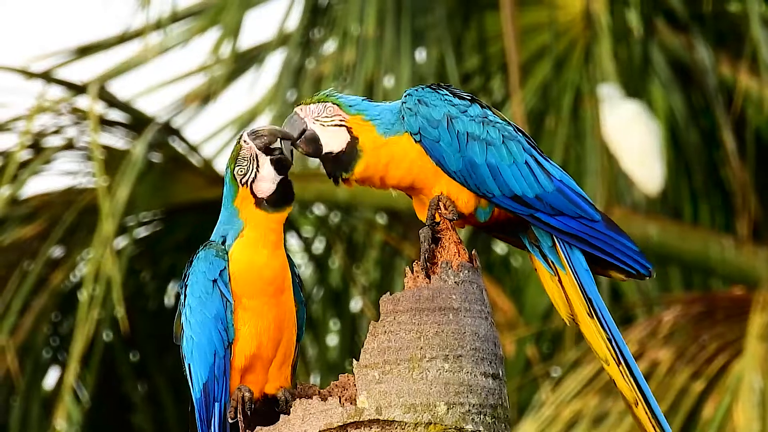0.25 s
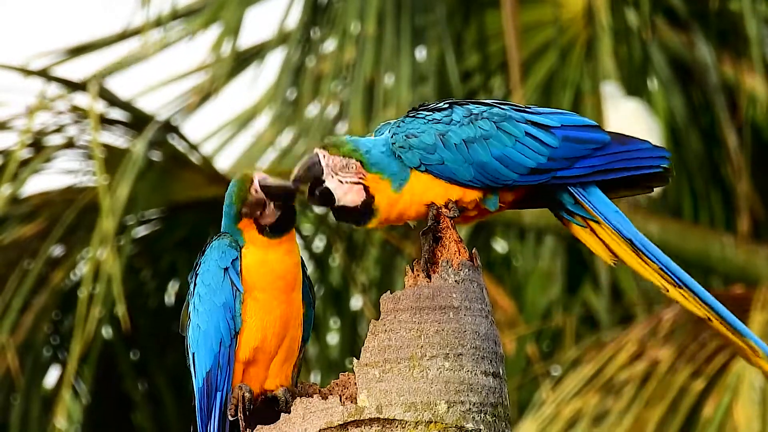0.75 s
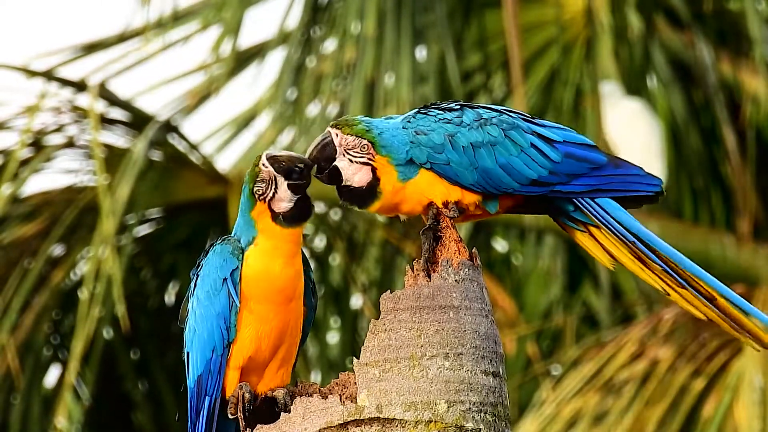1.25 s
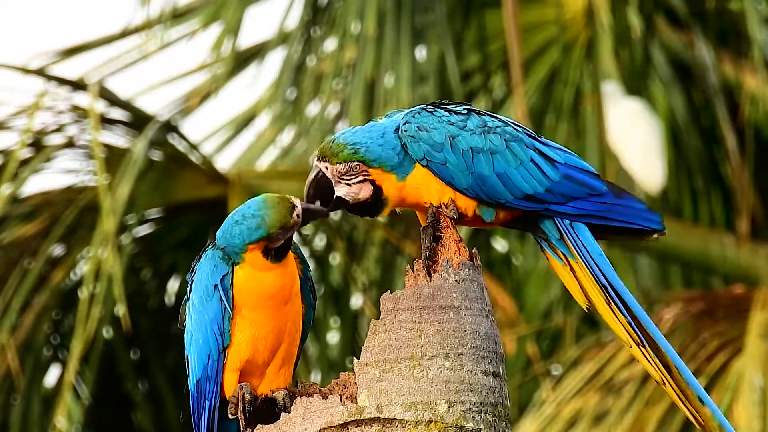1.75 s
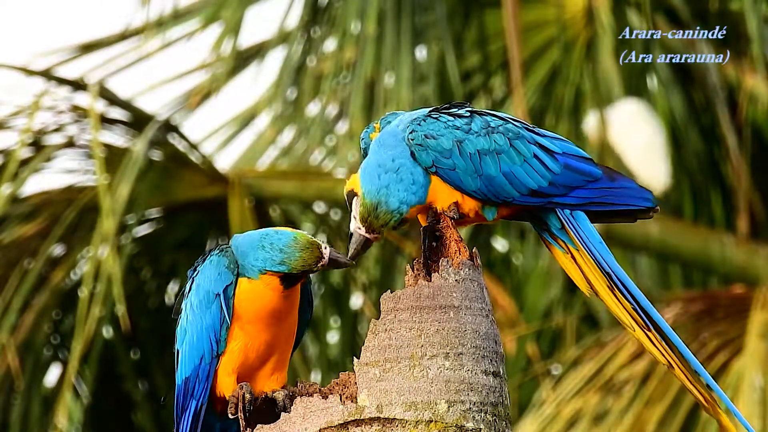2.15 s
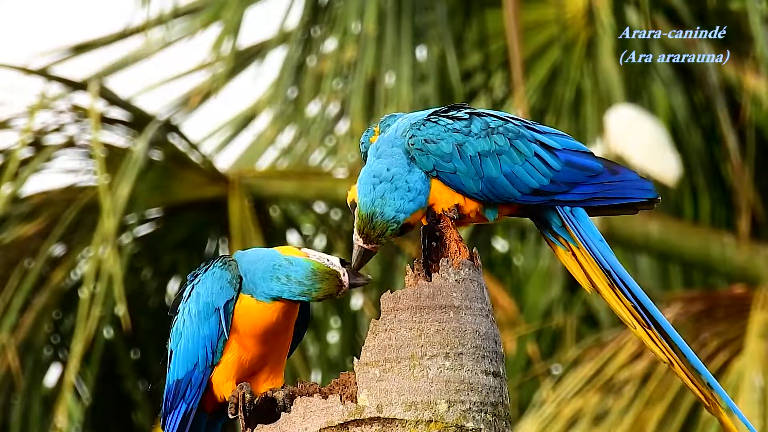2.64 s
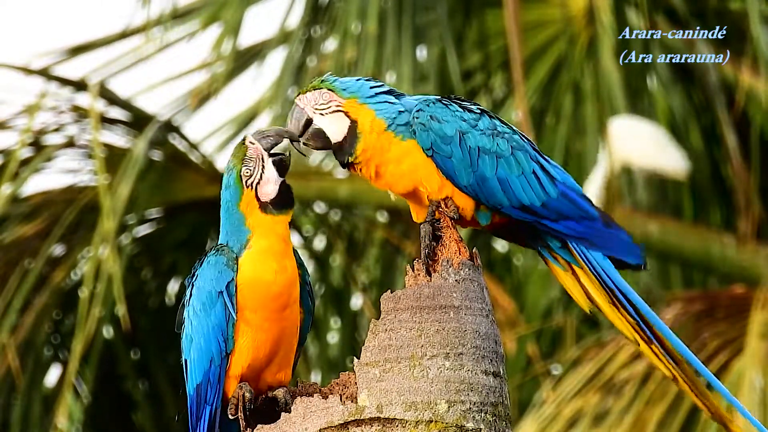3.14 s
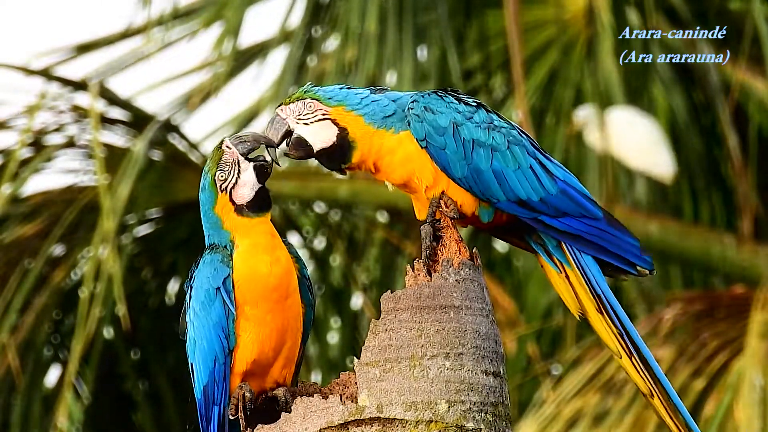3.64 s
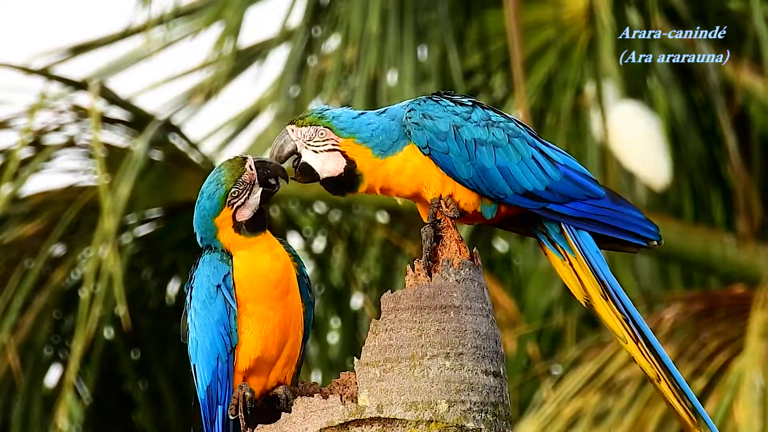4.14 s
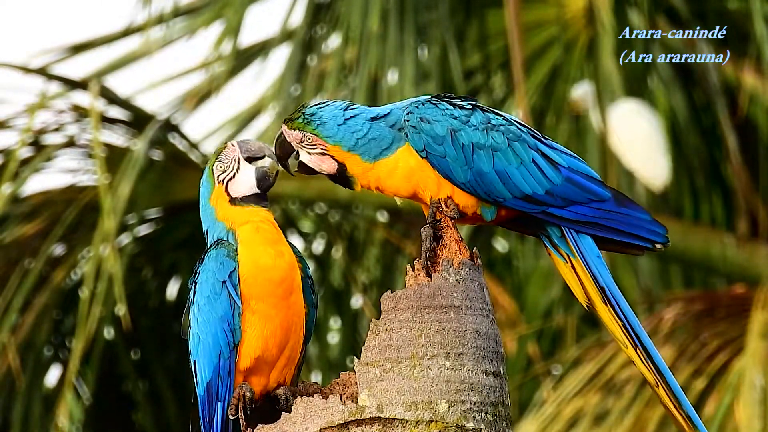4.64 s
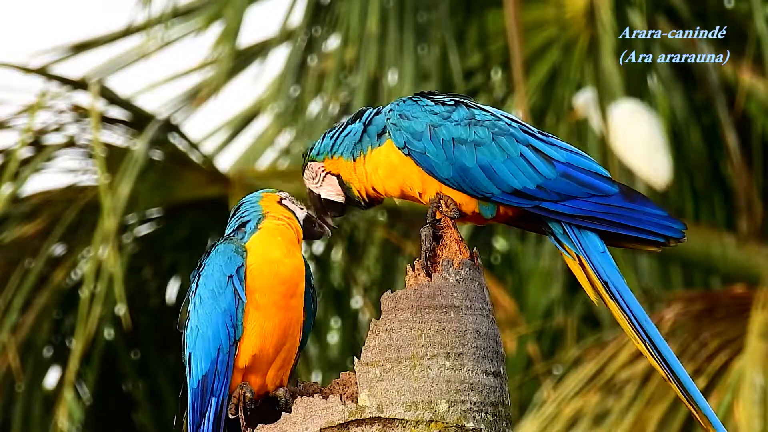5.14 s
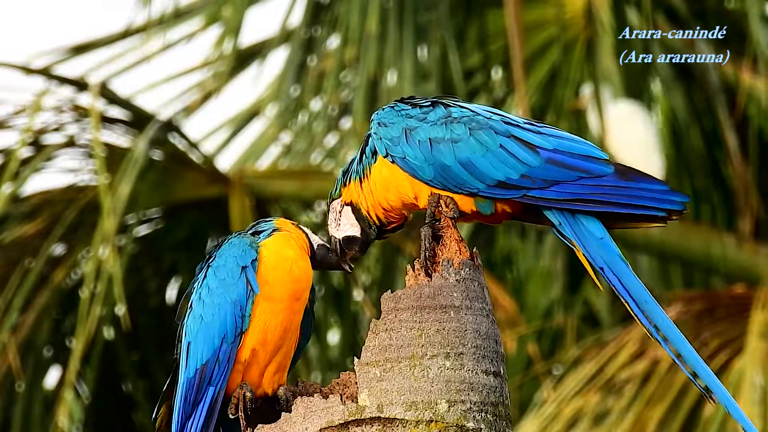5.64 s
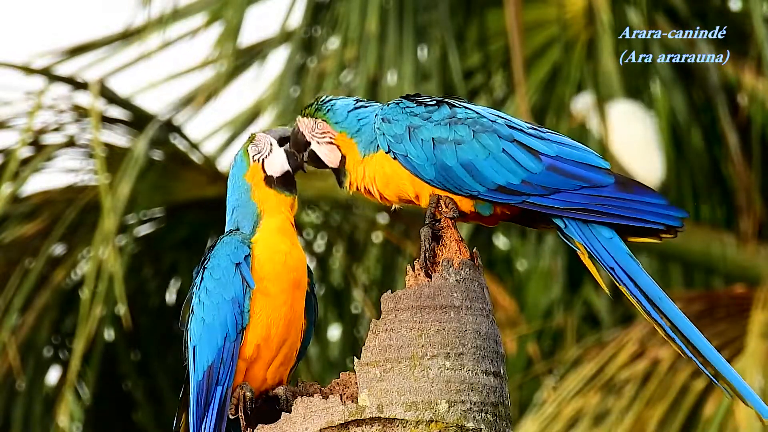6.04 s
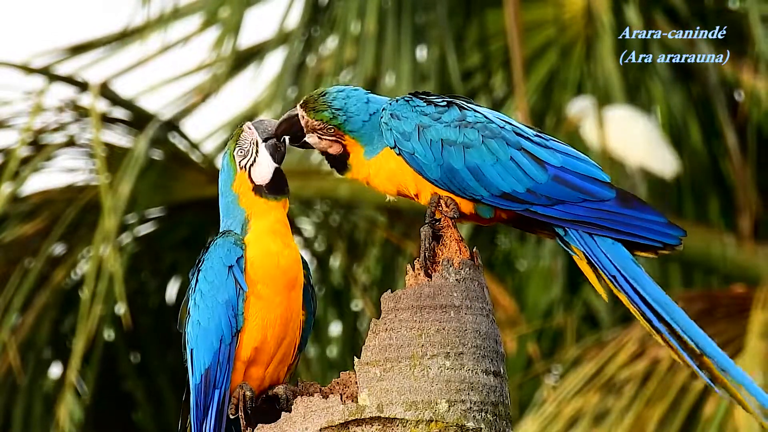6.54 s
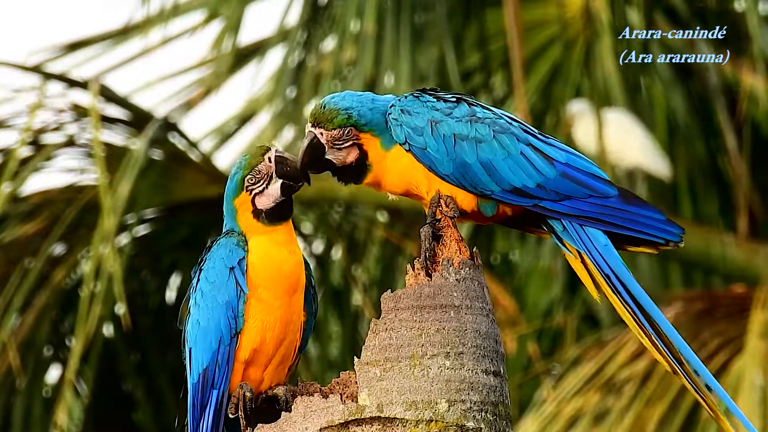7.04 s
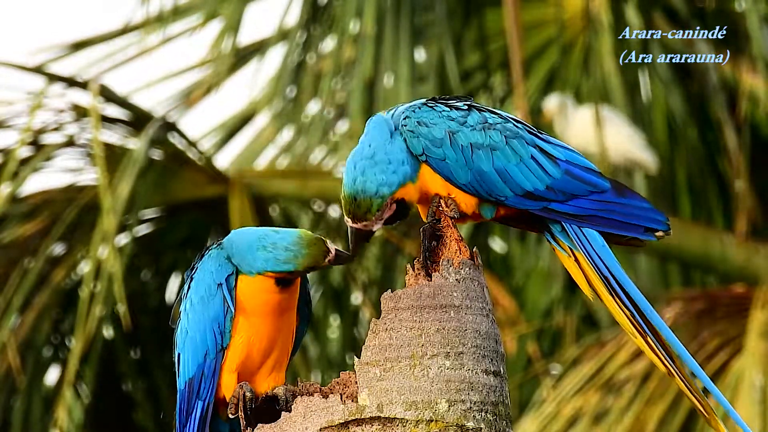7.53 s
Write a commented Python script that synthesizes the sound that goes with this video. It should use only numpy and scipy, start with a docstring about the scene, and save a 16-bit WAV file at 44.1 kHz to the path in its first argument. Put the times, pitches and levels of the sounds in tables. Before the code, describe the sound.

A steady, bright hiss of air and leaves runs throughout, with faint twittering from distant birds. Two macaws call fairly close, near the centre, with a short echo from the trees. After a small squeak, harsh squawks start at about 0.5 seconds and build to a loud, longer cry at 1.1 to 1.3 seconds. Quick rasps, creaks and squeaks follow until 2 seconds, then the birds pause. A soft grumble at 3.2 seconds leads to a rasp and a loud, rough screech at 3.6 seconds. Quiet, hoarse squeaks follow. A clear chirp rises and falls from 4.7 to 4.9 seconds, with a shorter second arch at 5.3 seconds and small squeaks around it. Softer growling squawks come between 6.3 and 6.7 seconds, then a creak at 7 seconds, a faint rasp and a few last squeaks around 7.5 seconds.

```python
"""Two macaws squawk and squeak outdoors as they fence with their beaks on a palm stump.
Squawks: ragged syrinx pulses ring the throat and windpipe. Short squeaks and a clear chirp
in two arches: harmonics through a beak resonance. Far birds twitter and whistle in a steady
bright hiss, with two faint hoots and one dull tick. The trees send back a short echo."""
import sys
import numpy as np
from scipy import signal
from scipy.fft import rfft, irfft
from scipy.io import wavfile
from scipy.ndimage import uniform_filter1d, map_coordinates

SR = 44100
rng = np.random.default_rng(int(sys.argv[2]) if len(sys.argv) > 2 else 0)


def store_wav(level_fs):
    """Save 16-bit WAV to argv[1]."""
    pcm = np.round(np.clip(np.atleast_2d(level_fs), -1, 1) * 32767)
    wavfile.write(sys.argv[1], SR, pcm.T.astype(np.int16))


N = 343180


def from_db(db):
    """Decibels to gain."""
    return 10 ** (np.asarray(db) / 20)


def rms_one(x):
    """Scale to unit power."""
    return x / np.sqrt(np.mean(x ** 2) + 1e-20)


def level_out(voice):
    """Hold the running power at 1."""
    power = uniform_filter1d(uniform_filter1d(voice ** 2, size=400), size=400)
    return voice / np.sqrt(power + 1e-12)


def at_hz(points, hz):
    """Read a spectrum on a log-frequency axis."""
    points = np.array(points)
    return np.interp(np.log(np.maximum(hz, 1)), np.log(points[:, 0]), points[:, 1])


def drift(size, rate_hz):
    """Smooth random wander, spread about 1."""
    step = np.arange(size) * rate_hz / SR
    return map_coordinates(rng.standard_normal(4096), [step], order=3, mode="wrap")


def butter(x, hz, kind, order):
    """Causal high- or low-pass."""
    return signal.sosfilt(signal.butter(order, hz, kind, fs=SR, output="sos"), x)


def resonance(x, hz, width_hz):
    """Two-pole resonator, peak gain 1, applied twice for steep skirts."""
    r = np.exp(-np.pi * width_hz / SR)
    b = np.array([1, 0, -1]) * (1 - r * r) / 2
    a = [1, -2 * r * np.cos(2 * np.pi * hz / SR), r * r]
    return signal.lfilter(b, a, signal.lfilter(b, a, x))


def span(start_s, end_s, fade_s):
    """Time axis and window of a call; fades centred on its ends."""
    t = np.arange(int((start_s - fade_s / 2) * SR), int((end_s + fade_s / 2) * SR)) / SR
    ramp = np.clip(np.minimum(t - start_s, end_s - t) / fade_s + .5, 0, 1)
    return t, np.sin(np.pi / 2 * ramp)


def add(out, t, sound):
    """Mix a call in at its time."""
    first = int(round(t[0] * SR))
    out[first:first + len(t)] += sound[:max(N - first, 0)]


def hiss():
    """Steady air and leaf hiss: centred in the midrange, wide in the treble."""
    spectrum = [(71, -99), (120, -67), (300, -51.5), (563, -29), (733, -29.5), (975, -15), (1120, -14),
                (1410, -2), (1690, -6.5), (2300, -6.5), (3000, -4), (3580, -3), (4050, -4), (6600, 2.5),
                (8950, -12), (10100, -26), (15500, -32.5)]  # (frequency [Hz], relative density [dB])
    # humps, hollows, thin whines: (centre [Hz], width [Hz], lift [dB])
    peaks = [(900, 26, 3), (1016, 89, -1), (1230, 97, 0), (1510, 100, -2.5), (3450, 100, 1.5),
             (3890, 57, -6), (7150, 160, 1), (7760, 280, -6), (8340, 35, 4), (8740, 40, 4), (8880, 35, 4),
             (9125, 100, 4.5)]
    stereo_width = [(60, -2), (110, 0), (200, -16), (380, -19), (700, -23.5), (1290, -16), (2380, -10.5),
                    (4400, -5), (8120, 1.5), (15000, 1)]  # (frequency [Hz], side minus mid [dB])
    hz = np.arange(N // 2 + 1) * SR / N
    peaks_db = sum(db * np.exp(-.5 * ((hz - centre) / width) ** 2) for centre, width, db in peaks)
    mid, side = rfft(rng.standard_normal((2, N))) * from_db(at_hz(spectrum, hz) + peaks_db)
    mid = irfft(mid, N)
    side = irfft(side * from_db(at_hz(stereo_width, hz)), N)
    level_db = -39.5 + .15 * drift(N, 8)
    return from_db(level_db) * (mid + side * [[1], [-1]]) / np.std(mid)


def whistle(pitch_hz, rough, tone, beak_hz, lift_db):
    """Clear voice: harmonics swell as they cross resonances; roughness shakes pitch and level."""
    size = len(pitch_hz)
    pitch_hz = pitch_hz * (1 + rough * (.027 * drift(size, 170) + .032 * drift(size, 900)))
    phase = 2 * np.pi * np.cumsum(pitch_hz) / SR
    voice, power = 0, 0
    for k in range(1, 12):
        beak_db = lift_db * np.exp(-.5 * ((k * pitch_hz - beak_hz) / 520) ** 2)
        gain = from_db(at_hz(tone, k * pitch_hz) + beak_db)
        harmonic = gain * np.sin(k * phase + rng.uniform(0, 2 * np.pi))
        voice += harmonic * (1 + .92 * rough * drift(size, 500))
        power += gain ** 2 / 2
    return voice / np.sqrt(power) * from_db(6 * rough * np.tanh(drift(size, 200)))


def squeaks(notes, max_rough):
    """Short arched glides: pure ones sit on one beak resonance, impure ones are rough."""
    tone = [(600, -42), (1100, -13.5), (2100, -1.5), (3400, -3.5), (4500, 0.5), (5500, 0), (6700, -3),
            (7700, -17.5), (9500, -30.5), (15000, -47)]  # harmonic envelope: (frequency [Hz], gain [dB])
    out = np.zeros(N)
    for start_s, length_s, hz, glide, level_db, beak_hz, purity in notes:
        t, window = span(start_s + .002, start_s + max(length_s, .01) - .002, fade_s=.01)
        along = np.linspace(-1, 1, len(t))
        pitch_hz = hz * (1 + glide * along / 2 - .017 * along ** 2)
        voice = whistle(pitch_hz, max_rough * (1 - purity), tone, beak_hz, lift_db=33 * purity)
        add(out, t, from_db(level_db) * window * voice)
    return out


def far_birds(count):
    """Faint hoarse notes at random times and pitches."""
    notes, level_db, purity = [], -52.5, .4
    for when, length, height, bend, beak in rng.random((count, 5)):
        start_s, length_s = .02 + when * (N / SR - .2), .034 + .041 * length
        pitch_hz, glide, beak_hz = 650 + 500 * height, .297 * (bend - .5), 1300 + 2200 * beak
        notes.append((start_s, length_s, pitch_hz, glide, level_db, beak_hz, purity))
    return squeaks(notes, max_rough=1.2)


def thin_notes():
    """Short, thin notes: the macaws' squeaks and a few pure whistles from a far bird."""
    # (start [s], length [s], pitch [Hz], glide [share of pitch], level [dB], beak [Hz], purity [0-1])
    notes = [ (.23, 0.059, 1170, 0.028, -40.5, 3520, 0.73), (.38, 0.027, 1028, -.04, -46, 3080, .87),
             (1.03, 0.03, 1205, 0.22, -35, 3600, 0.6), (1.403, .028, 1245, 0.14, -30.5, 4220, .45),
             (1.425, .022, 1070, 0.2, -40, 4200, .35), (1.443, .021, 1118, -.02, -29.5, 3380, 0.73),
             (1.647, 0.027, 1070, -.015, -34.5, 5500, 0.38), (1.695, 0.046, 1114, .03, -32.5, 5060, 0.58),
             (1.725, 0.0405, 1130, -.04, -38.5, 4500, 0.6), (1.875, 0.021, 1272, .17, -34, 4350, 0.85),
             (1.895, 0.039, 1220, 0.13, -40.5, 4930, .38), (2.478, 0.038, 1183, 0.039, -41.5, 3550, 1),
             (3.243, 0.0089, 1215, 0.019, -34.5, 2430, 0.5), (3.876, 0.045, 885, 0.08, -39, 2580, 0.18),
             (3.92, 0.028, 994, 0.004, -40.5, 2000, 0.3), (3.952, 0.085, 1005, 0.042, -44.5, 2360, 0.17),
             (4.033, .042, 1121, -0.00084, -38, 3420, 0.33), (4.075, 0.034, 837, -0.19, -39.5, 2460, 0.3),
             (4.385, .05, 1040, -0.064, -43, 2200, 0.18), (4.44, 0.046, 983, -0.15, -41.5, 1900, 0.3),
             (4.49, 0.092, 954, 0.09, -42.5, 1890, 0.13), (4.98, 0.046, 1085, 0.09, -36.5, 4660, 0.24),
             (5.02, 0.031, 1086, -0.11, -35, 4700, 0.2), (5.157, .04, 1098, 0.029, -33.5, 4900, 0.24),
             (5.598, .042, 1142, -0.097, -41.5, 2250, .55), (5.633, 0.034, 1034, 0.11, -39, 2060, .6),
             (5.883, 0.051, 829, 0.00085, -39, 3460, 0.22), (5.935, 0.047, 992, -0.052, -38, 5200, 0.37),
             (5.995, .042, 1028, 0.146, -40, 3080, 0.1), (6.165, 0.048, 980, -0.028, -43.5, 2000, 0.16),
             (6.88, .075, 1117, .005, -44, 3380, 0.24), (7.49, 0.036, 760, 0.025, -37, 2250, 0.3),
             (7.51, 0.046, 838, 0.09, -37.5, 3400, 0.1), (7.55, 0.032, 870, -0.02, -45, 4420, 0.2),
             (7.675, 0.052, 972, 0.027, -50, 1950, .55)]
    return butter(squeaks(notes, max_rough=.55), hz=775, kind="high", order=4)


def syrinx(t, pulse_hz, jitter):
    """The syrinx slaps shut at ragged intervals, each time with a puff of turbulence."""
    harsh = jitter / .064  # more ragged: noisier, with blunter resonances
    cycles = np.cumsum(pulse_hz * np.exp(jitter * drift(len(t), 300))) / SR
    slaps = rms_one(np.diff(np.floor(cycles), prepend=0))
    puffs = rms_one(np.exp(-.71 * (cycles % 1)) * rng.standard_normal(len(t)))
    source = rms_one(slaps + .83 * harsh * puffs) * from_db(1.5 * drift(len(t), 250.5))
    return source, puffs, harsh


def throat(source, puffs, harsh, shape, tilt_db_oct=0):
    """Slaps and puffs ring the throat; the puffs also ring the windpipe."""
    # shape: (4 x (resonance [Hz], gain [dB]), top resonance gain [dB])
    shapes = { "grumble": (1320, -4, 2400, -6.5, 3200, -7, 4298, -12, -12),
              "growl": (1327, -6, 2080, -9, 2520, -7, 4100, -4, -17),
              "bark": (1357, -6.5, 1640, -6, 2481, -8, 4148, -12.5, -7),
              "squawk": (1341, -2.5, 1952, -3.5, 2376, -1.5, 4502, -4, -6),
              "caw": (1335, -4.5, 1641, -2.5, 2450, -4.5, 4680, -5.5, -20),
              "rasp": (1334, 0, 2900, 5.5, 3390, 6.5, 4346, 1, -8),
              "creak": (1950, 0.5, 3397, 9.5, 4595, 6, 5197, 7, -5),
              "cry": (1450, 2.5, 1950, 1.5, 2380, -.5, 4450, -2, -17),
              "wide cry": (1600, 2, 2030, -1.5, 3378, 5.5, 3880, 2.5, -7),
              "screech": (2070, 6, 2720, 0, 3750, 2, 4550, -4, -16),
              "wide screech": (2036, 5.5, 3520, 10.5, 4502, 9, 4780, 5, -2.5)}
    base_widths_hz = [317, 370, 380, 1080]  # of the four resonances at harsh = 1
    windpipe = [(863, 80, -21.5), (1312, 153, -4.5), (2086, 110, -17), (2494, 79, -1), (3475, 130, -11),
                (4300, 220, -13)]  # (resonance [Hz], width [Hz], gain [dB])
    top_hz, top_width_hz = 6150, 1460
    *formants, top_db = shapes[shape]
    centres_hz, gains_db = formants[::2], formants[1::2]
    widths_hz = np.array(base_widths_hz) * np.sqrt(harsh)
    voice = from_db(-14) * harsh * butter(puffs, hz=4550, kind="low", order=1)  # breath leak
    for hz, db, width_hz in [*zip(centres_hz, gains_db, widths_hz), (top_hz, top_db, top_width_hz)]:
        tilt_db = tilt_db_oct * np.log2(hz / centres_hz[1])
        voice += from_db(db + tilt_db) * resonance(source, hz, width_hz)
    voice = butter(voice, hz=1013, kind="high", order=7)
    for hz, width_hz, db in windpipe:
        voice += from_db(db) * resonance(puffs, hz, width_hz)
    return level_out(butter(voice, hz=7340, kind="low", order=8) + from_db(-29) * voice)


def short_squawks():
    """Each swells, holds and dies away, throbbing, with one throat shape."""
    # (start [s], attack [s], hold [s], release [s], level [dB], pulse rate [Hz], jitter [share],
    #  tilt [dB/oct], throb [dB], throat shape)
    calls = [ (0.463, 0.031, 0.081, .02, -41.5, 290, 0.089, -3, 3.5, "grumble"),
             (.563, 0.032, 0.023, 0.049, -32, 350, 0.053, -3, .5, "bark"),
             (.82, 0.056, 0.014, 0.06, -25, 307, 0.096, -1, 0.1, "squawk"),
             (0.945, .054, .014, .06, -26.3, 279, 0.083, -2, -0.5, "caw"),
             (1.331, 0.052, 0.013, 0.012, -31, 392, .12, 1.5, 1, "rasp"),
             (1.518, 0.017, 0.019, 0.024, -38, 548, 0.046, -6, -0.5, "bark"),
             (1.655, 0.013, 0.038, .012, -34, 406, 0.085, 2, -1, "creak"),
             (1.835, .02, 0.0086, 0.029, -35.5, 400, .1, -1, 1, "creak"),
             (3.193, 0.058, 0.17, .04, -39.5, 287, 0.08, 1, 1.5, "grumble"),
             (3.458, 0.084, 0.016, .012, -35, 310, 0.086, -0.5, .5, "rasp"),
             (6.03, 0.011, 0.026, .014, -37, 296, 0.12, -2.5, 2.2, "creak"),
             (6.29, .07, 0.089, 0.097, -35, 220, 0.19, -2.5, 1.5, "growl"),
             (6.506, 0.049, 0.031, 0.077, -32.5, 170, .17, -7.5, 3.5, "bark"),
             (6.992, 0.03, .008, .033, -37, 480, .12, 7, 2.5, "creak"),
             (7.21, 0.1, 0.074, .04, -44, 190, 0.12, 8, -3.5, "rasp")]
    throb_hz = 37.3
    out = np.zeros(N)
    for start_s, *stages_s, level_db, pulse_hz, jitter, tilt_db_oct, throb_db, shape in calls:
        corners_s = start_s + np.cumsum([0, *stages_s])
        t = np.arange(int(start_s * SR), int(corners_s[-1] * SR)) / SR
        swing_db = -throb_db * np.cos(2 * np.pi * throb_hz * (t - start_s))
        envelope = np.interp(t, corners_s, [0, 1, 1, 0]) * from_db(level_db + swing_db)
        add(out, t, envelope * throat(*syrinx(t, pulse_hz, jitter), shape, tilt_db_oct))
    return out


def squawks():
    """All harsh calls, with the bass below 500 Hz filtered out."""
    # two long calls: (time [s], relative level [dB], treble share that sets the beak opening [dB])
    cry_curve = [(1.072, -26, -4.5), (1.218, -18, -1.5), (1.26, -23, -3), (1.32, -22.5, -6.5),
                 (1.335, -28.5, -7)]
    screech_curve = [(3.562, -30, 0), (3.584, -19.5, -2.5), (3.646, -23, 0), (3.702, -28, -6.5),
                     (3.725, -34, -7.5)]
    cry = long_squawk(cry_curve, "cry", "wide cry", pulse_hz=335, jitter=.055)
    screech = long_squawk(screech_curve, "screech", "wide screech", pulse_hz=256, jitter=.12)
    calls = short_squawks() + from_db(-.5) * cry + from_db(-1) * screech
    return butter(calls + 1e-18, hz=500, kind="high", order=4)


def hoots():
    """Faint far tones that slide a little."""
    # (start [s], end [s], first pitch [Hz], last pitch [Hz], level [dB])
    notes = [(0.703, 0.844, 437, 470, -82), (2.464, 2.745, 590, 550, -79.5)]
    out = np.zeros(N)
    for start_s, end_s, first_hz, last_hz, level_db in notes:
        t, window = span(start_s, end_s, fade_s=.042)
        phase = 2 * np.pi * np.cumsum(np.linspace(first_hz, last_hz, len(t))) / SR
        add(out, t, from_db(level_db) * window * np.sqrt(2) * np.sin(phase))
    return out


def long_squawk(curve, narrow, wide, pulse_hz, jitter):
    """The throat widens and narrows with the beak opening; the effort surges at random."""
    times_s, level_db, treble_db = np.transpose(curve)
    t, window = span(times_s[0], times_s[-1], fade_s=.012)
    shut_db, swing_db = -5, 3.5
    opening = np.clip((np.interp(t, times_s, treble_db) - shut_db) / swing_db, 0, 1)
    source = syrinx(t, pulse_hz, jitter)
    voice = level_out((1 - opening) * throat(*source, narrow) + opening * throat(*source, wide))
    surge_db = .9 * drift(len(t), 60)
    out = np.zeros(N)
    add(out, t, voice * window * from_db(np.interp(t, times_s, level_db) + surge_db))
    return out


def chirp():
    """Clear call in two arches, hoarse where soft; the beak opens on each rise."""
    # (time [s], pitch [Hz], relative level [dB])
    long_arch = [(4.675, 957, -39), (4.691, 1067, -36), (4.717, 1158, -26.5), (4.739, 1150, -28),
                 (4.781, 1337, -25), (4.809, 1276, -19.5), (4.839, 1336, -26.5), (4.843, 1296, -23.5),
                 (4.871, 1232, -35), (4.881, 1207, -35), (4.903, 1206, -34.5), (4.917, 1120, -32),
                 (4.945, 1100, -38)]
    short_arch = [(5.288, 1040, -40), (5.306, 1090, -34), (5.316, 1075, -31), (5.332, 1176, -26),
                  (5.35, 1241, -22.5), (5.362, 1186, -25), (5.378, 1136, -38)]
    tone = [(1200, -27), (2200, -2), (2600, -8.5), (3400, 0), (3900, -9), (4550, 6), (5100, -5), (5750, 4),
            (6400, -2.5), (6950, -2.5), (7600, -10.5), (9200, -36), (15000, -63)]  # harmonic envelope: (frequency [Hz], gain [dB])
    out = np.zeros(N)
    for arch in (long_arch, short_arch):
        times_s, *columns = np.transpose(arch)
        t, window = span(times_s[0], times_s[-1], fade_s=.008)
        pitch_hz, level_db = [np.interp(t, times_s, column) for column in columns]
        rough = .14 + .0209 * (level_db.max() - level_db)
        opening = np.clip((np.linspace(0, 1, len(t)) - .22) / .16, 0, 1)
        voice = whistle(pitch_hz, rough, tone, beak_hz=5000, lift_db=-8.5 + 15 * opening)
        add(out, t, from_db(level_db - 1) * window * voice)
    return out


def tick(time_s, cutoff_hz):
    """One soft, dull tick."""
    impulse = np.full(N, 1e-18)
    impulse[int(time_s * SR)] = SR / (2 * np.pi * cutoff_hz)
    return from_db(-37) * butter(impulse, cutoff_hz, "low", order=2)


def trees(x, t60_s, delay_s):
    """Scattered echoes from trunks and fronds, different for each ear."""
    tone = [(500, -31), (1300, -11), (2500, 0), (4500, 1), (8000, 6.5), (15000, 9)]  # echo colour: (frequency [Hz], gain [dB])
    t = np.arange(SR // 2) / SR
    tail = rng.standard_normal((2, len(t))) * from_db(-60 * t / t60_s) * (t > delay_s)
    tail /= np.sqrt(np.sum(tail ** 2, axis=1, keepdims=True))
    hz = np.fft.rfftfreq(len(t), 1 / SR)
    tail = irfft(rfft(tail) * from_db(at_hz(tone, hz)), len(t))
    return signal.fftconvolve(x[None], tail, axes=1)[:, :N]


def scene():
    """Birds just right of centre; a near reflection ripples their spectrum, the trees answer."""
    birds = thin_notes() + from_db(.56) * squawks() + chirp() + far_birds(count=50)
    n, reflection_s = np.arange(N), .001778
    birds -= from_db(-23) * np.interp(n - reflection_s * SR, n, birds)
    direct = birds * from_db([[-.4], [.3]])
    early = from_db(-7) * trees(birds, t60_s=.042, delay_s=.00019)
    late = from_db(-12.5) * trees(birds, t60_s=.97, delay_s=.013)
    background = hoots() + hiss() * from_db([[-.3], [.3]])
    return direct + early + late + tick(time_s=5.158, cutoff_hz=900) + background


def record(dry):
    """Steep low-pass at 15.8 kHz."""
    return signal.sosfilt(signal.ellip(12, .1, 80, 15800, fs=SR, output="sos"), dry)


dry = scene()
out = record(dry)
store_wav(out)
```